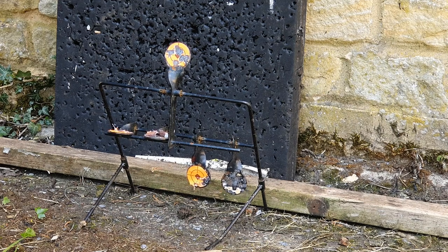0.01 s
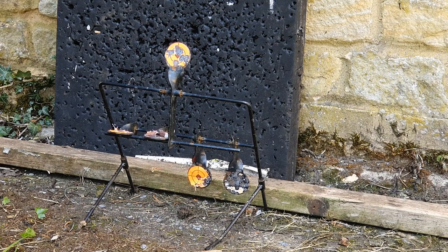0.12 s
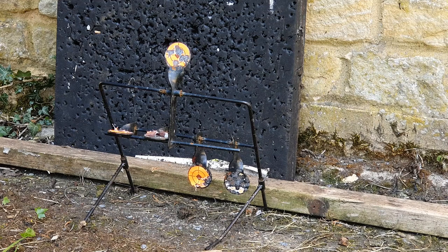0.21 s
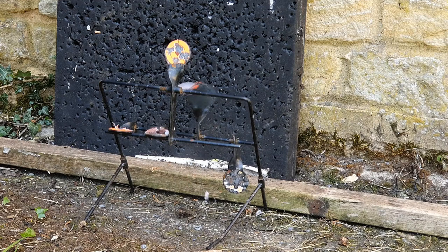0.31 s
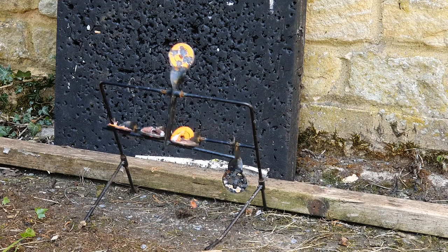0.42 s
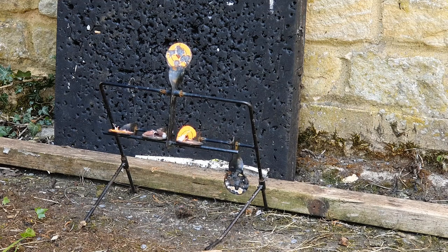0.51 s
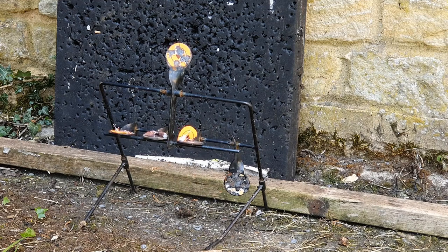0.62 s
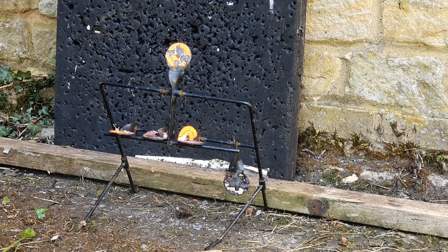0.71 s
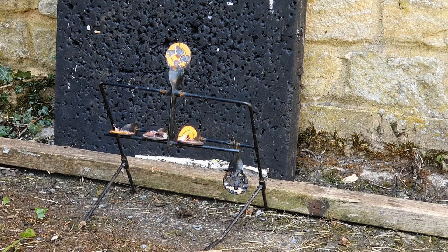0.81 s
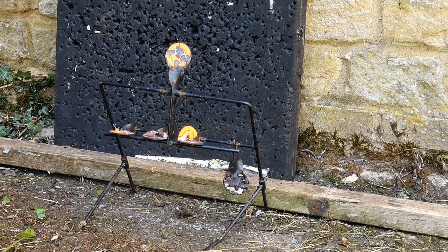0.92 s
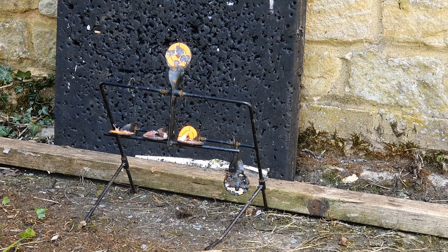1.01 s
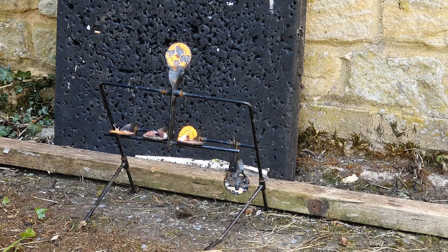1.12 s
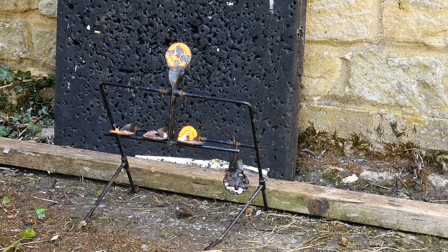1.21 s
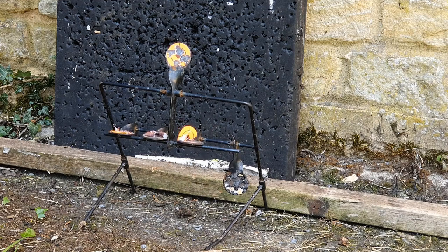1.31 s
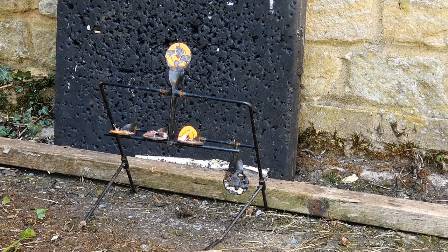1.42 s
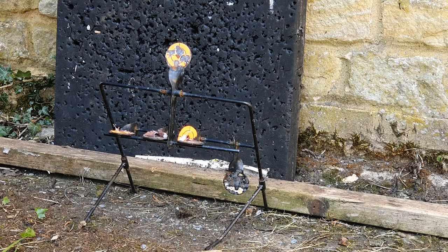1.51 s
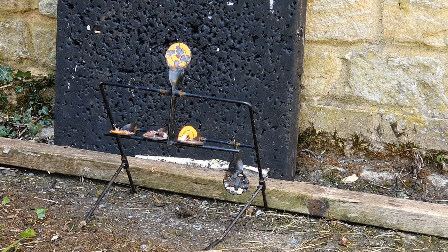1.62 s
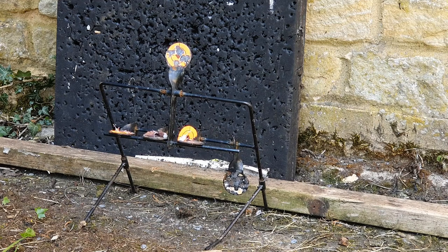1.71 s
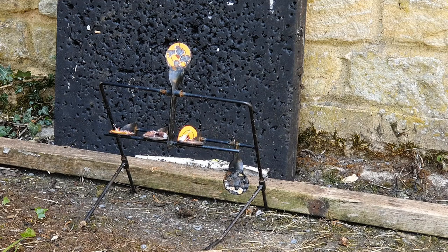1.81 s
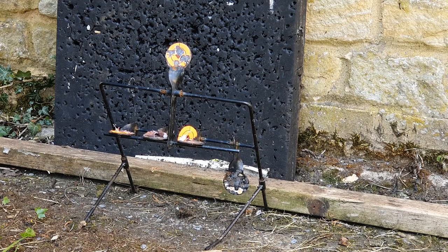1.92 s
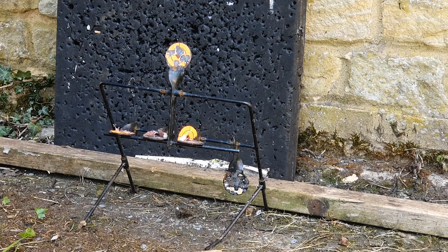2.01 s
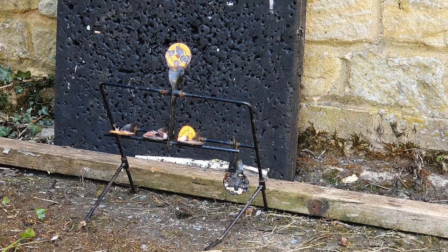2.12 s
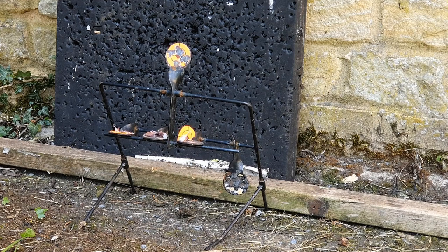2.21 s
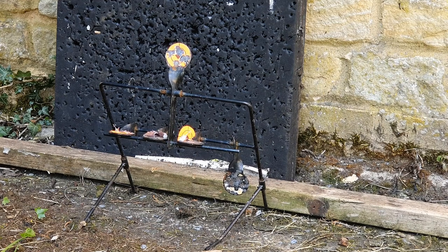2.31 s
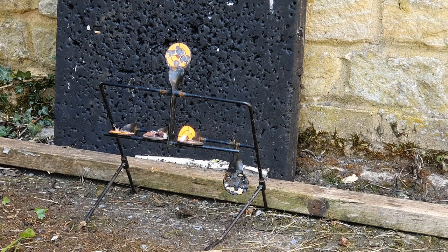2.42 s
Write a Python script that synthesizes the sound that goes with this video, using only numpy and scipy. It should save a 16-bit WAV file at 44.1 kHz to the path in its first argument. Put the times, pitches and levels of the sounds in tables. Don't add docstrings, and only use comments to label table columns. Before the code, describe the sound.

An air rifle cracks and its pellet clangs a steel spinner target, which rattles briefly outdoors.

```python
import sys
import numpy as np
from scipy import signal
from scipy.fft import rfft, irfft, next_fast_len
from scipy.io import wavfile
from scipy.ndimage import uniform_filter1d, map_coordinates

SR = 44100
rng = np.random.default_rng(int(sys.argv[2]) if len(sys.argv) > 2 else 0)


def to_linear_factor(level_db):
    exponent = np.asarray(level_db, float) / 20
    return 10 ** exponent


def digitize_waveform(pressure):
    field = np.atleast_2d(pressure).T
    bounded = np.clip(field, -1, 1)
    quanta = np.round(bounded * 32767).astype(np.int16)
    wavfile.write(sys.argv[1], SR, quanta)


N = 110250
T = np.arange(N) / SR
CRACK_S = 0.0048


def unit(x):
    return x / np.sqrt(np.mean(x ** 2) + 1e-20)


def along(points, hz):
    f, v = np.transpose(points)
    return np.interp(np.log(hz + 1), np.log(f + 1), v)


def wobble(rate_hz, channels=1):
    knots = rng.standard_normal((channels, 400))
    return np.array([map_coordinates(k, [T * rate_hz]) for k in knots])


def blur(width_hz, shape, size):
    position = np.arange(size) * width_hz / SR
    i = position.astype(int)
    part = position - i
    knots = rng.standard_normal((*shape, 1500, 2)) @ [1, 1j] / np.sqrt(2)
    return knots[..., i] * (1 - part) + knots[..., i + 1] * part


def filtered(x, response):
    m = next_fast_len(x.shape[-1] + 8192)
    spectrum = rfft(x, m) * response(np.fft.rfftfreq(m, 1 / SR))
    return irfft(spectrum, m)[..., :x.shape[-1]]


def hiss(spectrum, alike, size=N):
    a, b = filtered(rng.standard_normal((2, size)), lambda hz: to_linear_factor(along(spectrum, hz)))
    turn = np.arccos(np.clip(alike, -1, 1)) / 2
    shared, apart = np.cos(turn) * a, np.sin(turn) * b
    return unit(np.array([shared + apart, shared - apart]))


def add(track, start_s, sound, pan_db=0):
    part = track[:, round(start_s * SR):][:, :sound.shape[1]]
    part += sound[:, :part.shape[1]] * to_linear_factor([[pan_db / 2], [-pan_db / 2]])


def burst(hz, width_hz, t60_s, snap=0):
    t = np.arange(SR // 4) / SR
    push = to_linear_factor(-60 * t / t60_s) * rng.standard_normal((2, len(t))) + snap * (t == 0)
    x = filtered(push, lambda f: (1j * f * width_hz / (hz * hz - f * f + 1j * f * width_hz)) ** 2)
    return x / np.abs(x).max(axis=1, keepdims=True)


# start_s, level_db, pan_db
BUFFETS = [(0.0, -54, 3.5), (0.051, -64.5, -3), (0.102, -50, 28.5), (0.212, -72.5, 15), (0.24, -40.5, -2.5),
           (0.49, -60, 5), (0.67, -68, 24), (0.721, -56.5, -21.5), (0.91, -54, 22), (0.96, -62.5, 6.5),
           (1.34, -62.5, 6), (1.698, -54, 21), (1.74, -64, 11), (1.84, -52, 28), (2.0, -52.5, -1.5),
           (2.109, -48, 9), (2.18, -58.5, 0), (2.5, -54.5, -0.5)]
# hz, level_db
RUMBLE = [(12, -41), (20, 0.5), (70, 4), (114, -8), (200, -31), (232, -28), (500, -52.5), (650, -72.5),
          (1100, -120)]
# hz, level_db
AIR = [(88, -28.5), (150, 0), (586, -24), (2200, -28), (2480, -29), (2900, -28), (7480, -41), (14900, -39),
       (16800, -48.5)]
# time_s, level_db
AIR_LEVEL = [(0, -68), (.7, -77.5), (1.2, -81.5), (1.9, -73), (2.5, -71)]


def wind():
    s, level_db, pan_db = np.transpose(BUFFETS)
    buffet = hiss(RUMBLE, 0.45)
    power = np.abs(uniform_filter1d(buffet ** 2, 4000, axis=1))
    buffet = buffet / np.sqrt(power + 0.05)
    gust_db = 1.4 + np.interp(T, s, level_db) + np.interp(T, s, pan_db) * [[0.5], [-0.5]]
    air_db = np.interp(T, *np.transpose(AIR_LEVEL)) + 1.6 * wobble(8.3)
    return to_linear_factor(gust_db) * buffet + to_linear_factor(air_db) * hiss(AIR, 0.24)


# hz, level_db
DRONE = [(230, -85), (295, -92)]


def drone():
    out = np.zeros(N)
    for hz, level_db in DRONE:
        sway = 1 + 1.1 * blur(23, (), N)
        out += to_linear_factor(level_db) * np.imag(sway * np.exp(2j * np.pi * hz * T))
    return out


# start_s, level_db, centre_hz, width_hz, t60_s
TICKS = [
    (1.4666, -48, 11530, 1795, 0.0065),
    (1.466, -60, 15200, 900, 0.0044),
    (1.466, -57, 7200, 2500, 0.0055),
    (1.467, -60, 4400, 5000, 0.054),
    (1.474, -70, 7060, 3000, 0.073),
    (1.894, -72.5, 6600, 3010, 0.4),
    (1.897, -62.5, 2400, 4800, 0.25),
    (2.134, -58, 2250, 1500, 0.15),
    (2.496, -62.5, 1497, 5000, 0.055),
]


def ticks():
    out = np.zeros((2, N))
    for start_s, level_db, hz, width_hz, t60_s in TICKS:
        add(out, start_s, to_linear_factor(level_db) * burst(hz, width_hz, t60_s))
    return out


def sing(notes, width_hz, breath, attack_s):
    out = np.zeros(N)
    for start_s, length_s, start_hz, end_hz, level_db in notes:
        u = (T - start_s) / length_s
        rise = np.clip(u * length_s / attack_s, 0, 1)
        fall = np.clip((1 - u) * length_s / 0.041, 0, 1)
        pitch_hz = end_hz + (start_hz - end_hz) * (1 - np.clip(u, 0, 1)) ** 2
        tone = np.exp(2j * np.pi * np.cumsum(pitch_hz) / SR)
        out += to_linear_factor(level_db) * rise * fall * np.imag((1 + breath * blur(width_hz, (), N)) * tone)
    return out


# start_s, length_s, start_hz, end_hz, level_db
WHISTLES = [(-.1, 0.23, 1775, 1748, -66.5), (.12, 0.088, 1760, 1756, -67), (.58, 0.21, 1737, 1754, -76.5),
            (0.8, 0.22, 2620, 2547, -76.5), (.99, 0.14, 2510, 2517, -66), (1.11, 0.15, 2507, 2516, -71),
            (0.761, 0.048, 4507, 4500, -86.5), (0.888, 0.091, 4423, 4250, -83.5),
            (2.132, 0.071, 2400, 2229, -72.5), (2.21, 0.26, 2327, 2300, -90.5),
            (1.82, 0.072, 4050, 4154, -86.5)]
# start_s, length_s, start_hz, end_hz, level_db
GLIDES = [
    (.17, 0.11, 5324, 4786, -57.5),
    (1.315, 0.12, 5294, 4864, -60.5),
]
# start_s, length_s, start_hz, end_hz, level_db
CHIRPS = [
    (1.65, .08, 3670, 3610, -96),
    (.17, 0.16, 5570, 5446, -84.5),
    (1.315, 0.078, 5710, 5380, -80),
    (1.4, 0.064, 4836, 4470, -79),
    (2.175, 0.047, 5130, 4950, -75),
    (2.175, 0.045, 3964, 4180, -72.5),
    (2.176, 0.054, 4560, 4390, -78),
]


def birds():
    far = sing(WHISTLES, 77, 0.88, 0.021) * to_linear_factor(0.5 * wobble(22))
    near = sing(GLIDES, 190, 0.6, 0.05) + sing(CHIRPS, 550, 3, 0.0084)
    return far * to_linear_factor([[1.5], [-1.5]]) + near * to_linear_factor([[0.6], [-0.6]])


# hz, t60_s
GARDEN = [(100, .7), (600, .75), (2500, 0.46), (6000, 0.31), (14000, 0.2)]


def garden(x):
    wall_s = 0.0079
    hz, t, z = signal.stft(rng.standard_normal((2, SR)), SR, nperseg=256)
    decay = to_linear_factor(-60 * t / along(GARDEN, hz)[:, None])
    tail = signal.istft(z * decay, SR, nperseg=256)[1]
    tail = np.pad(tail / np.linalg.norm(tail[0]), ((0, 0), (round(wall_s * SR), 0)))
    return signal.fftconvolve(x, tail, axes=1)[:, :N]


# start_s, pitch_hz, level_db, t60_s
LEGS = [
    (.385, 6430, -47.5, .3),
    (.444, 6460, -47.5, 0.61),
    (.478, 7000, -44, 0.28),
    (.49, 8048, -50.5, 0.26),
    (.45, 2600, -40.5, 0.23),
    (0.41, 3300, -44, .25),
    (.433, 13740, -39.5, .2),
]


def legs():
    out, t = np.zeros((2, N)), np.arange(SR // 2) / SR
    still_s, rise_s = 0.33, 0.0059
    for start_s, hz, level_db, t60_s in LEGS:
        sway = 1 + 0.4 * blur(60, (2,), len(t))
        tone = sway * np.exp(2j * np.pi * (hz * t + rng.random((2, 1))))
        decay = to_linear_factor(level_db - 60 * t / t60_s - 20 * (t / still_s) ** 4)
        add(out, start_s, decay * (1 - np.exp(-t / rise_s)) * np.imag(tone))
    return out


# hz, level_db
SPLASH = [(180, -48.5), (300, -23.5), (2930, -13), (3360, -1.5), (8160, -12.5), (10500, -4), (15700, -15),
          (16500, -30.5)]


def splash():
    out, t = np.zeros((2, N)), np.arange(SR // 2) / SR
    flutter_db = 4.2 * wobble(130, channels=2)[:, :len(t)]
    level_db = -25 - 60 * t / 0.38 - 30 * (t / 0.25) ** 4 + flutter_db
    add(out, CLANGS[0][0], to_linear_factor(level_db) * hiss(SPLASH, 0.2, size=len(t)), -2.5)
    return out


# centre_hz, width_hz, share_lost
GAPS = [(8900, 350, .8), (12700, 600, .8), (14450, 350, .85), (11100, 300, .6)]


def gapped(x):
    def response(f):
        cuts = [1 - share * np.exp(-((f - hz) / width_hz) ** 2) for hz, width_hz, share in GAPS]
        return np.prod(cuts, axis=0)
    return filtered(x, response)


# start_s, crack_db, ring_db, pan_db
CLANGS = [
    (0.2744, -0.5, -31, 4),
    (.38, -4.5, -17.5, -0.5),
    (0.3824, -3, -33, -6.5),
    (.405, -39.5, -25, 2.5),
    (.433, -38, -28.5, -3),
    (0.445, -46.5, -35.5, -8),
    (0.463, -39, -40, -6.5),
    (.478, -27, -34, -2.5),
    (0.488, -48, -43, -3.5),
    (0.539, -37, -71, 18),
]
# hz, level_db, t60_s
PADDLE = [(3500, -15.5, .1), (4530, -16, 0.05), (5330, -9.5, .06), (10350, -0.5, 0.45), (13440, -17, .1),
          (15200, -20, 0.16)]
# hz, level_db, t60_s
LANDING = [(3090, -15, .08), (4027, -13, .15), (4668, -9, .12), (4776, 0, .2), (5317, -8, .1),
           (7800, -13, .04), (9396, -13, .13), (10108, -12, .13), (10348, -8, .13), (10451, -2, .14),
           (11600, -18, .15), (13740, -15, .14), (15181, -8, .15), (15730, -15, .1)]
# hz, level_db, t60_s
FRAME = [(2404, -24, 0.35), (3385, -14.5, 0.16), (4700, -4, 0.122), (5281, 1.5, 0.12), (5685, -15, 0.12),
         (8048, 0, 0.14), (9620, -4, 0.104), (10300, -11, 0.31), (10300, 2.5, 0.077), (11600, -9, 0.11),
         (13780, -1.5, 0.072), (15210, -20.5, 0.15), (15680, -16, .12)]
# hz, level_db
SIZZLE = [(180, -73), (300, -32.5), (4310, -7.5), (5500, -7.5), (8870, -13), (10300, -8), (11200, -13.5),
          (15600, -14.5), (16500, -37)]


def steel():
    out, t = np.zeros((2, N)), np.arange(SR // 3) / SR
    chatter_hz, chatter_t60_s, sizzle_db, sizzle_t60_s = 250, 0.17, 1, 0.1
    for k, (start_s, crack_db, ring_db, pan_db) in enumerate(CLANGS):
        if k == 0:
            modes, chatter_db = PADDLE, 7.5
        else:
            modes, chatter_db = (LANDING if k <= 3 else FRAME), -1
        hz, mode_db, t60_s = np.transpose(modes)[:, :, None, None]
        level_chance, phase_chance = rng.standard_normal((2, len(hz), 2, 1))
        chatter = to_linear_factor(chatter_db - 60 * t / chatter_t60_s)
        sway = 1 + chatter * blur(chatter_hz, (len(hz), 2), len(t))
        tone = np.imag(sway * np.exp(2j * np.pi * hz * t + 2j * phase_chance))
        ring = (to_linear_factor(mode_db + 0.92 * level_chance - 60 * t / t60_s) * tone).sum(axis=0)
        ring = ring * (1 - np.exp(-t / 0.00065)) * (1 - t / t[-1])
        sizzle = to_linear_factor(sizzle_db - 60 * t / sizzle_t60_s) * gapped(hiss(SIZZLE, 0.22, size=len(t)))
        sizzle = sizzle * (1 - np.exp(-t / 0.002))
        add(out, start_s, to_linear_factor(ring_db) * (ring + sizzle), pan_db)
        add(out, start_s, to_linear_factor(crack_db) * burst(5000, 9000, CRACK_S * 2, snap=9), pan_db)
    return out


# start_s, peak_db, pan_db, centre_hz
SHOTS = [
    (0.2412, -5, 5.5, 5977),
    (.251, 1.5, -8, 3884),
]
# start_s, peak_db, pan_db, centre_hz
ECHOES = [
    (.2445, -21.5, -0.5, 5000),
    (.2538, -14, -3, 4240),
    (.2562, -16, -3.5, 4000),
    (.2655, -20, 0, 3500),
    (.2995, -20.5, -2, 3316),
]
# hz, level_db
BLAST = [(35, -31.5), (60, -2), (150, -6.5), (464, -9.5), (1100, -11.5), (2190, -8.5), (4030, -9.5),
         (15000, -19), (16500, -42.5)]


def rifle():
    out, t = np.zeros((2, N)), np.arange(SR // 4) / SR
    valve_s, valve_db = 0.2385, -36.5
    blast_db, blast_t60_s = -23, 0.064
    thump_hz, thump_db, thump_t60_s = 90.23, -29.5, 0.054
    add(out, valve_s, to_linear_factor(valve_db) * burst(6800, 9000, 0.03))
    for start_s, peak_db, pan_db, hz in SHOTS:
        flutter_db = 2.5 * wobble(130, channels=2)[:, :len(t)]
        puff = to_linear_factor(blast_db - 60 * t / blast_t60_s + flutter_db) * hiss(BLAST, 1, size=len(t))
        push = to_linear_factor(thump_db - 60 * t / thump_t60_s) * np.sin(2 * np.pi * thump_hz * t)
        crack = to_linear_factor(peak_db) * burst(hz, 4200, CRACK_S, snap=3.1)
        add(out, start_s, crack + puff + push, pan_db)
    for start_s, peak_db, pan_db, hz in ECHOES:
        add(out, start_s, to_linear_factor(peak_db) * burst(hz, 2500, CRACK_S * 1.1, snap=1.5), pan_db)
    return out


def scene():
    shot, metal, calls, grit = rifle(), steel() + legs() + splash(), birds(), ticks()
    out = wind() + drone()
    for source, wet_db in [(shot, -9), (metal, -19.5), (calls, -3.5), (grit, -9.5)]:
        out = out + source + to_linear_factor(wet_db) * garden(source)
    return out


def band_limit(x):
    return signal.sosfilt(signal.butter(12, 17020, fs=SR, output="sos"), x)


def record(dry):
    port_lag_s, dip_s, fade_out_s, fade_in_s = 0.00016, 2.166, 0.042, 0.03
    clip, low_hz, top_hz = 1.1, 28.5, 15850
    lag_s = port_lag_s * np.array([[0.5], [-0.5]])
    fade = np.maximum((dip_s - T) / fade_out_s, (T - dip_s) / fade_in_s)
    x = filtered(dry, lambda hz: np.exp(2j * np.pi * hz * lag_s)) * np.clip(fade, 0.05, 1) ** 1.5
    x = x / (1 + np.abs(x / clip) ** 6) ** (1 / 6)
    x = filtered(x, lambda hz: hz ** 2 / (hz ** 2 + low_hz ** 2) / (1 + (hz / top_hz) ** 120))
    return band_limit(x)


dry = scene()
out = record(dry)
digitize_waveform(out)
```